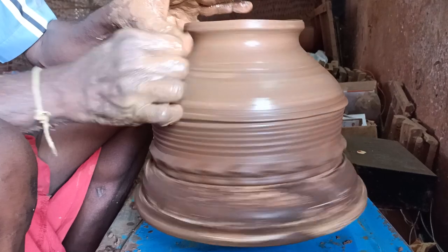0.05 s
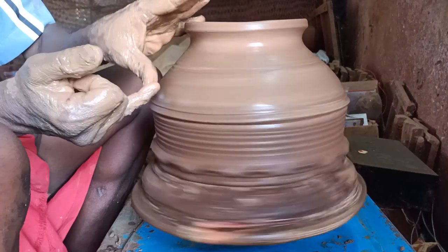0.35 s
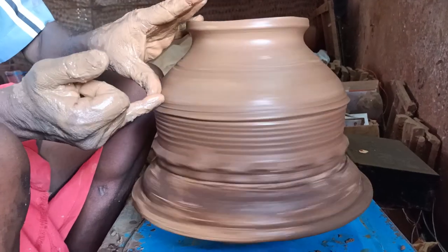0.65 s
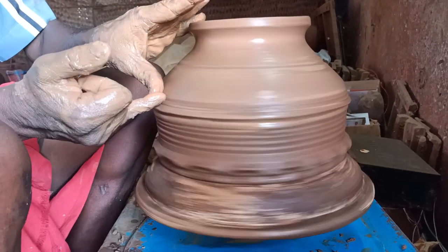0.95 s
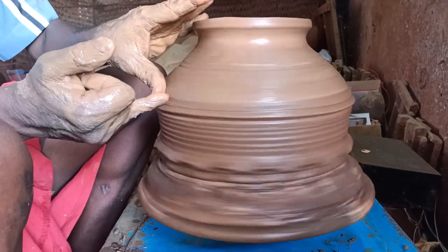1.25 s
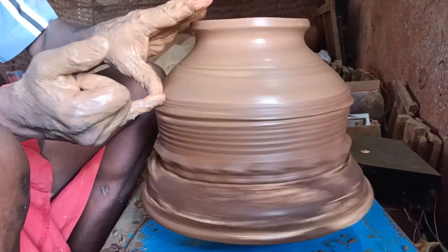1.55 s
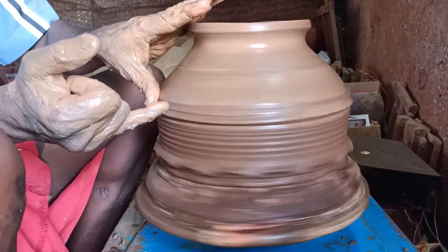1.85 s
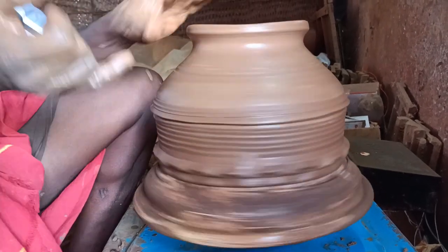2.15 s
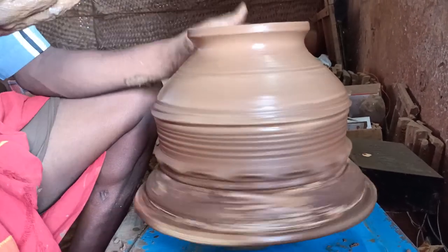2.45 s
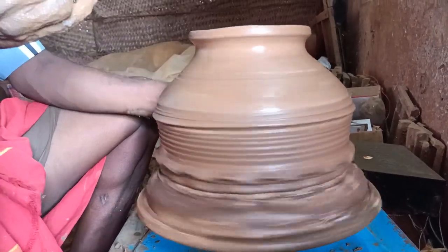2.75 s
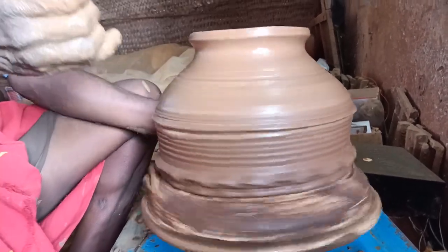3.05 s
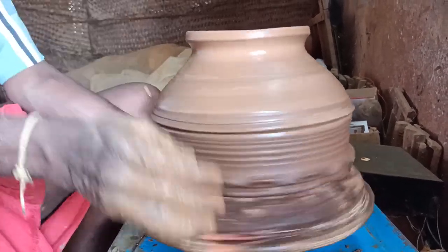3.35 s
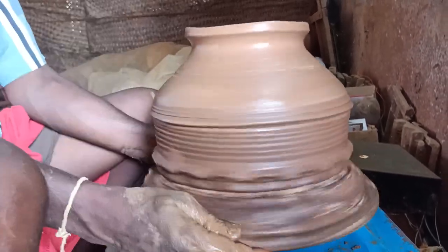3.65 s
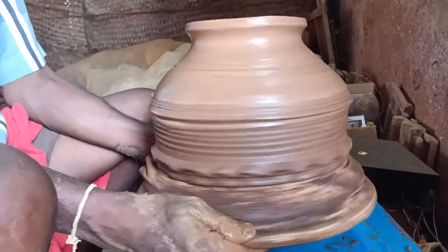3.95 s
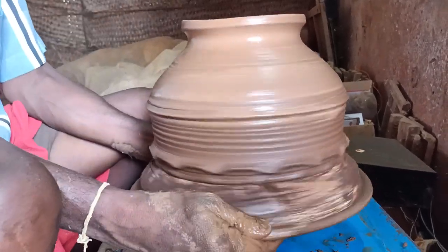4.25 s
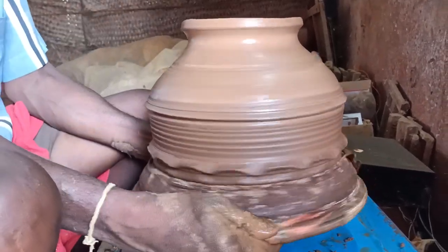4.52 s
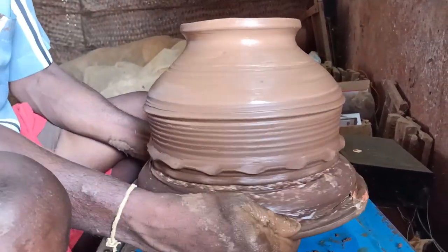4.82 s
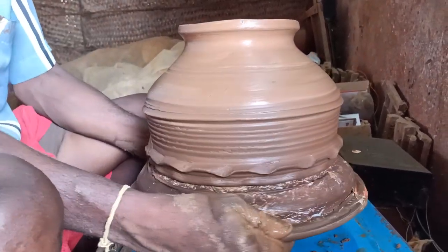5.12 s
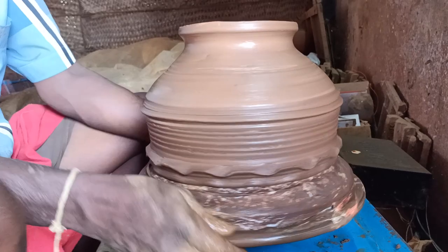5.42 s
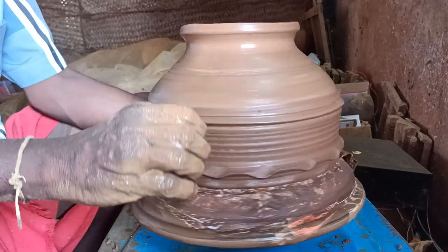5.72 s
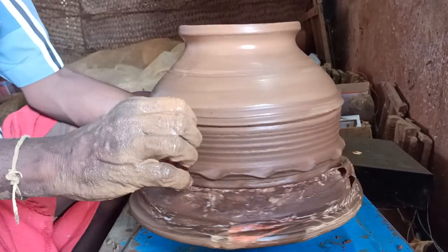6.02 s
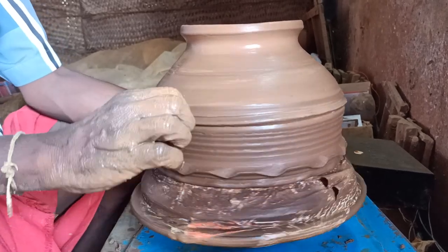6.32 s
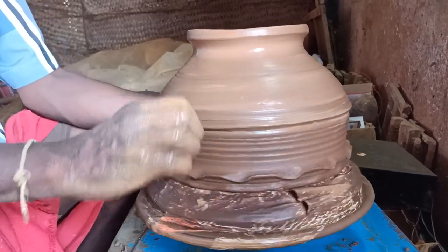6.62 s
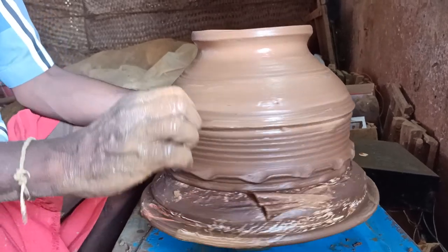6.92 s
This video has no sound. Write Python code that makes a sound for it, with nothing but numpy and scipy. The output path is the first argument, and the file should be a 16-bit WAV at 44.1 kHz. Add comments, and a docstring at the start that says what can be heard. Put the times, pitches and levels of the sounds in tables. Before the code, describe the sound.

Gritty rumble of a spinning pottery wheel; a small tool snaps down, wet clay squeaks under a hand, and the wheel slows, groaning softly.

```python
"""A small workshop: a motor-driven potter's wheel carries a heavy wet pot, and its gritty bearing sets the
steel stand rumbling and rattling. The motor's hum is switched off and a small hard tool skitters down
with a snap. A palm drags on the wet clay, squeaking as it sticks and slips, and brakes the wheel almost
to rest. Nudged on, the wheel rolls slowly with a low groan and faint knocks."""
import sys
import numpy as np
from scipy import signal
from scipy.fft import rfft, irfft, next_fast_len
from scipy.io import wavfile
from scipy.ndimage import uniform_filter1d

SR = 44100
rng = np.random.default_rng(int(sys.argv[2]) if len(sys.argv) > 2 else 0)


def unload_wav(signal):
    """Save mono or channel-first audio to the path in sys.argv[1] as 16-bit WAV at rate SR, clipped to [-1, 1]."""
    wavfile.write(
        sys.argv[1],
        SR,
        np.round(np.clip(np.atleast_2d(signal).T, -1, 1) * 32767).astype(np.int16),
    )


N = 312228
TIME = np.arange(N) / SR

# Levels in the tables are relative: each layer sets its own trim in the mix.
# Tone colours. Each row: frequency in Hz, level in dB.
AIR_SPECTRUM = [(15, -38), (25, -19), (42, -1.5), (55, 2), (76, 0.5), (200, -15), (270, -42), (416, -10),
                (840, -25.5), (5140, -36.5), (6210, -57.5), (9840, -38.5), (14400, -41), (16000, -55.5)]
TOOL_SPECTRUM = [(40, -23), (300, -14), (2000, -19.5), (2700, -5.5), (4500, -16), (7300, -26.5),
                 (8300, -10.5), (9100, 3.5), (10000, -4.5), (12000, -10.5), (15500, -33.5)]
POP_SPECTRUM = [(500, -31), (2500, -39), (4500, -10), (7000, -8), (9500, 11), (12500, -1), (15500, -28)]
CLAY_SPECTRUM = [(20, -12), (45, -7), (70, -3), (310, 5.5), (660, -7), (850, -6), (1350, 1), (1550, 1),
                 (1950, 4.5), (2300, -6), (3000, 5), (4000, -10), (4700, -11), (5700, -6.5), (6200, -41),
                 (16000, -35)]
SIZZLE_SPECTRUM = [(3820, -43), (6500, -18), (6830, -22), (7330, -19.5), (7760, -17.5), (8210, -7),
                   (9330, 0.5), (10500, -1), (13100, -13), (16000, -55)]

# How each part rings. Each row: frequency in Hz, bandwidth in Hz, level in dB.
MOTOR_SHELL_MODES = [(420.8, 7, -5.5), (497, 8.4, -7.5), (569, 9, 5.5), (675, 4, -4.5), (865, 7.2, 5),
                     (955, 25, -8.5), (2636, 13, -9), (3200, 12, -6.5)]
HOLLOW_MODES = [(439, 35, -1), (484, 35, 1.5), (550, 30, 0.38)]  # where the tool lands
DRAG_MODES = [(408, 14, 1), (628, 55, -1), (704, 91, -5), (1112, 34, -8.5), (1353, 33, -6)]  # the palm's groan
JUDDER_MODES = [(78, 35, 0)]  # the palm's low shudder
CREEP_MODES = [(414, 17, 2), (453, 34, -8)]  # the bearing at a crawl
HOUSING_MODES = [(1870, 240, -16), (2405, 120, 4), (2720, 330, 2.5), (2940, 130, -1), (3433, 220, -6.5),
                 (4530, 130, -5.5), (5600, 300, -18)]
SHAFT_MODES = [(119.6, 12, -3.5), (148.2, 8.3, 13), (433, 12, -25)]
STAND_MODES = [(200.6, 17, 7.5), (210.5, 48, -3), (233, 46, -38)]
PLATE_MODES = [(399, 64, -3), (417.6, 22.2, 4), (455.4, 33.3, -2.5), (504.7, 11.7, -0.5), (564.5, 20, -1),
               (644, 30, -6.5), (674, 78, -9), (843.3, 32, -4), (893, 19, -5.5), (956, 38, -4),
               (1039, 14.2, 1.5), (1101, 26, 0.5), (1138, 45, -1.5), (1322, 48, -6), (1450, 120, -12)]
FITTING_MODES = [(1670, 400, -9), (2356, 88, 3), (2677, 125, 2.5), (2978, 130, -2.5), (3172, 35.5, -0.5),
                 (3493, 250, -5.5), (4330, 410, -7), (4580, 124, -4.5), (4792, 56, -6.5), (5750, 400, -13)]

# Motor hum and whine. Each row: multiple of HUM_HZ, level in dB.
HUM_PARTIALS = [(1, 3.5), (2, 3), (3, -6.5), (10.48, -1)]
# One-shots. Each row: start in seconds, level in dB.
TOOL_BUMPS = [(2.945, -30), (2.99, -24), (3.02, -27.5)]
TOOL_TAPS = [(2.9974, -15.5), (3.032, -17), (3.048, -2.5), (3.0518, -10.5), (3.088, -15)]
CLAY_POPS = [(4.61, -27.5), (5.021, -40.5), (5.065, -46.5), (5.421, -54), (5.5323, -51), (5.561, -49),
             (5.68, -44), (5.848, -47), (6.244, -54)]
# Chirps from the clay. Each row: centre in seconds, length in seconds, pitch in Hz, level in dB.
CLAY_FIZZES = [(6.405, .03, 9980, -62), (6.48, .13, 10450, -68)]
PALM_SQUEAKS = [(3.99, .09, 1350, -41), (4.16, 0.071, 1410, -40), (4.222, 0.031, 1135, -31),
                (4.385, .04, 2030, -39.5), (4.41, 0.065, 1112, -33.5)]
# Fader rides for the pressing palm and the creeping bearing. Each row: time in seconds, level in dB.
PALM_RIDE = [(3.45, -52.5), (3.85, -43.5), (4.3, -49.5), (4.45, -52.5), (4.7, -54), (4.95, -80),
             (5.15, -99)]
CREEP_RIDE = [(5.5, -70), (5.63, -49), (5.95, -48.5), (6.1, -49.5), (6.25, -52), (6.68, -71), (6.95, -46),
              (7.08, -51.5)]

# The wheel's pace. Each row: time in seconds, share of full speed.
WHEEL_SPEED = [(2.7, 0.75), (3.6, 1), (4.6, 0.67), (5.1, 0.029), (5.45, .02), (5.7, 0.17), (7.08, 0.081)]
# The off-centre pot, the ball cage and the passing balls press in cycles.
# Each row: cycles per turn, first peak in turns, then relative swings of thrum, rumble and grit in dB.
WOBBLE_CYCLES = [(.5, .16, .8, .9, 1.1), (1, .27, .1, 1.3, 1.9), (2, .27, 1.7, .6, .5),
                 (3.73, .05, 1.8, .3, .3)]
# Load on the bearing. Each row: time in seconds, then shaft rocking, stand thrum and plate rumble in dB.
LOAD_RIDE = [(0, -34, -25.5, -24.5), (.3, -34, -33.5, -29.5), (2.55, -35.5, -31, -29),
             (2.75, -29, -30, -27), (3.45, -42, -31, -30), (3.72, -33.5, -30.5, -26),
             (4.2, -41.5, -33.5, -30.5), (4.42, -37.5, -32, -31.5), (4.92, -46, -40.5, -49.5),
             (5.1, -57.5, -65.5, -76), (5.42, -59, -48.5, -59), (5.49, -60, -57, -60),
             (5.54, -45, -48, -51), (5.62, -42.5, -33.5, -40.5), (5.73, -43, -34.5, -40.5),
             (5.86, -50, -37.5, -44), (5.94, -47, -37, -37.5), (6.05, -42.5, -44, -48.5),
             (6.35, -52.5, -42, -55), (6.8, -50.5, -52, -62.5), (6.88, -63, -42, -52),
             (7.08, -43, -67, -65)]
# Grit in the race. Each row: time in seconds, rattle in dB, sizzle in dB.
GRIT_RIDE = [(0, -29, -43), (.35, -32.5, -44), (2.8, -32.5, -44), (3.12, -28.5, -46.5), (3.4, -36, -47.5),
             (3.67, -29, -44.5), (4.1, -45, -47), (4.59, -49, -48), (4.91, -66.5, -61.5),
             (5.13, -78.5, -71), (5.46, -72.5, -72.5), (5.62, -55, -65.5), (5.76, -57, -72),
             (5.86, -57, -70), (5.95, -62, -72), (6.04, -71, -72), (7.08, -83, -76.5)]
# The race runs clear for a moment. Each row: centre in seconds, length in seconds, dip in dB.
GRIT_LULLS = [(0.32, .06, -3.5), (0.403, .06, -0.5), (1.234, 0.093, -4.5), (1.556, 0.051, -3),
              (1.66, 0.073, -3.5), (1.95, 0.057, -6.5), (2.074, 0.13, -4), (2.79, 0.071, -4.5)]
# The stand booms and the heavy load lurches. Each row: centre in seconds, length in seconds, level in dB.
STAND_BOOMS = [(.05, 0.1, -46), (.59, 0.048, -24), (.7, 0.046, -25.5), (1.01, 0.14, -24.5),
               (1.35, 0.14, -27), (1.69, 0.26, -29), (1.84, 0.057, -25), (2.03, 0.093, -22),
               (2.5, 0.062, -26.5), (3.69, 0.079, -26.5), (4.4, 0.3, -25.5), (4.64, 0.064, -26),
               (5.945, 0.1, -31.5), (6.875, 0.085, -38)]
LOAD_LURCHES = [(.84, 0.063, -31), (2.52, 0.14, -32.5), (2.8, 0.064, -31), (3.14, 0.038, -26.5),
                (3.99, 0.14, -31), (4.42, 0.083, -34), (5.41, 0.12, -44), (5.55, 0.11, -39),
                (5.84, 0.12, -38.5), (5.99, 0.081, -35.5), (6.33, 0.094, -43), (6.59, 0.25, -41),
                (6.97, 0.15, -39.5)]
# The shaft grinds on its housing.
# Each row: centre in seconds, length in seconds, then low plates, upper plates and rattle in dB.
SHAFT_RUBS = [(0.067, 0.031, -32, -23.5, -25), (0.993, 0.095, -47, -24, -25), (1.343, 0.1, -32, -34, -30.5),
              (1.636, 0.048, -21, -26.5, -29), (1.736, 0.047, -22.5, -26.5, -31),
              (1.812, 0.075, -32, -35, -25.5), (2.028, 0.065, -43, -21.5, -32.5),
              (2.561, 0.071, -37, -36, -24.5), (2.663, 0.1, -27.5, -25, -46), (2.75, 0.12, -30, -27, -44),
              (3.104, 0.21, -56, -43, -33), (3.542, 0.071, -24, -33, -28), (3.694, 0.051, -23, -23, -40),
              (3.815, 0.07, -23.5, -25.5, -46), (4.656, 0.12, -32.5, -34, -61), (4.842, 0.1, -42, -46, -65),
              (5.592, 0.1, -49, -43, -55), (5.775, 0.069, -59, -41, -46), (5.945, 0.06, -50, -48, -51),
              (6.185, 0.04, -45, -53, -64), (6.538, 0.031, -57, -53.5, -59), (6.572, 0.059, -66, -52, -66),
              (6.783, 0.027, -62.5, -64, -61), (6.827, 0.023, -61, -59, -47),
              (6.864, 0.096, -52.5, -42, -61), (6.976, 0.043, -50, -56, -70)]
# Play in the bearing knocks.
# Each row: start in seconds, level in dB, then offsets from it for plate weight and grit sizzle in dB.
BEARING_KNOCKS = [(0.014, -22, -7, 2), (0.055, -25, 10, 4), (0.126, -23, -1, 1.5), (0.185, -24, -1.5, 5.5),
                  (0.216, -24, -3, 4.5), (0.335, -22.5, 6, 3), (0.4504, -17, 0, -4), (0.494, -23, 9, 1),
                  (0.535, -31, 12, 3.5), (0.572, -23, -1.5, -1), (0.645, -27.5, 0, 2),
                  (0.771, -29.5, 3, 0.5), (0.817, -25, 10, 1), (0.887, -20, -3, -8.5),
                  (0.929, -20.5, -9, 1), (0.977, -18, 5.5, -1.5), (1.1287, -22.5, -5, -4.5),
                  (1.165, -31.5, -8, -5), (1.2954, -23, -2, -7.5), (1.3723, -19, 3.5, -2.5),
                  (1.415, -25.5, 12, 5.5), (1.445, -23.5, 6, -5), (1.612, -19.5, 6.5, -1.5),
                  (1.695, -18, 2, 2.5), (1.821, -27, 8, 6.5), (1.849, -21, 6, -1.5), (1.98, -25, 0, -3),
                  (2.133, -22.5, 2.5, -7), (2.176, -25.5, 4.5, -1.5), (2.2075, -23, 4.5, 5.5),
                  (2.327, -29, -3.5, 8.5), (2.371, -24.5, 3, 2.5), (2.458, -27.5, -3, 5),
                  (2.531, -21.5, 0, -1), (2.616, -21.5, -0.5, 1), (2.6468, -19, 4, 1), (2.7006, -19, 4, -2),
                  (2.85, -21.5, 5.5, -2.5), (2.9918, -18, 2, 4), (3.195, -32.5, 18, 4), (3.48, -27, 3, 6.5),
                  (3.523, -21, 5.5, 0.5), (5.5822, -46, 14, -3), (5.642, -36.5, 2, -7.5),
                  (5.705, -42, -2, -6), (5.7952, -33, 7, -4), (5.8778, -31.5, 7.5, -8.5),
                  (5.9177, -35.5, 5, 8.5), (6.085, -48, 8, -6), (6.2023, -48, 4, -1),
                  (6.2555, -40, 1, -5.5), (6.304, -41.5, 8.5, -4), (6.3768, -43, 5.5, -1.5),
                  (6.7175, -54, 8, 0), (6.833, -36.5, 3, -4), (7.058, -50.5, 7, -4)]
# Crossovers between the sizzle's bands. Each entry: frequency in Hz.
SPURT_EDGES_HZ = [9000, 9800, 10700, 11700, 12800]

ROOM_DULL_T60_S, ROOM_BRIGHT_T60_S = 0.5, 0.63
HUM_HZ, MOTOR_OFF_S = 100, 2.83  # the hum sits at twice the mains frequency
SKITTER_FROM_S, SKITTER_GAP_S, SKITTER_DB, SKITTER_RISE_DB = 2.848, 0.014, -28, 0.4
SCRAPE_S, SCRAPE_LENGTH_S, SCRAPE_DB = 4.39, 0.048, -46.5  # the palm catches once
GROAN_DB, GROAN_RISE_DB, GROAN_MAX_DB = -6.5, 34, 16.5  # against the rub: full speed, rise to rest, cap
TURNS_PER_S = 2.36  # at full speed
THRUM_WOBBLE, RUMBLE_WOBBLE, GRIT_WOBBLE = 0.54, 0.91, 0.16  # share of its swing that each part takes
SPURT_DB, SPURTS_PER_S = 2.2, 30
CLIP_CEILING, CUTOFF_HZ = 0.55, 15500


def from_db(db):
    """Decibels to gain."""
    return np.exp(np.asarray(db) * (np.log(10) / 20))


def unit_rms(x):
    """Scale to an rms of 1."""
    return x / np.sqrt(np.mean(x ** 2) + 1e-20)


def faders(ride):
    """Each dB column of a ride as a gain per sample."""
    times, *columns = np.transpose(ride)
    return [from_db(np.interp(TIME, times, db)) for db in columns]


def gate(start_s, end_s, fade_s):
    """A gate that fades in after its start and out before its end."""
    return np.clip((TIME - start_s) / fade_s, 0, 1) * np.clip((end_s - TIME) / fade_s, 0, 1)


def hump(centre_s, length_s):
    """One rounded rise and fall of height 1."""
    out = np.zeros(N)
    inside = np.abs(TIME - centre_s) < length_s / 2
    out[inside] = np.cos(np.pi * (TIME[inside] - centre_s) / length_s)
    return out


def swells(rows):
    """Humps, each with its own centre, length and level."""
    return sum(from_db(db) * hump(centre_s, length_s) for centre_s, length_s, db in rows)


def bursts(times, levels_db, rise_s, fall_s):
    """A percussive envelope triggered at each time."""
    triggers = np.zeros(N)
    np.add.at(triggers, np.clip(np.round(times * SR).astype(int), 0, N - 1), from_db(levels_db))
    t = TIME[:SR // 4]
    shape = (1 - np.exp(-t / rise_s)) * np.exp(-t / fall_s)
    return signal.oaconvolve(triggers, shape / shape.max())[:N]


def drift(rate_hz):
    """A smooth random modulator with an rms of 1."""
    step = 32
    size = next_fast_len(N // step + 2)
    hz = np.fft.rfftfreq(size, step / SR)
    slow = irfft(rfft(rng.standard_normal(size)) / (1 + (hz / rate_hz) ** 2), size)
    return np.interp(np.arange(N) / step, np.arange(size), unit_rms(slow))


def grains(per_s, spread_db):
    """A spray of tiny random impacts whose sizes scatter by spread_db; rms 1."""
    hits = np.flatnonzero(rng.random(N) < per_s / SR)
    chance = rng.uniform(-1, 1, N)[hits]
    size = np.minimum(-np.log(np.abs(chance) + 1e-12), 4)
    out = np.zeros(N)
    out[hits] = np.sign(chance) * from_db(spread_db * size)
    return unit_rms(out)


def colour(x, spectrum):
    """A minimum-phase EQ of unit energy that follows a spectrum."""
    size = 8192
    hz, db = np.transpose(spectrum)
    log_hz = np.log(np.fft.rfftfreq(size, 1 / SR) + 1)
    log_gain = np.log(from_db(np.interp(log_hz, np.log(hz), db)))
    cepstrum = irfft(log_gain)[:size // 2]
    cepstrum[1:] *= 2
    response = irfft(np.exp(rfft(cepstrum, size)))[:size // 2]
    return signal.oaconvolve(x, response / np.linalg.norm(response))[:N]


def resonate(force, modes, band_hz, shift_db=0):
    """Ring band-limited, damped modes; shift_db lets each one's level wander as the contact moves."""
    t = TIME[:SR // 3]
    rings = [(-1) ** k * from_db(db) * width * np.exp(-np.pi * width * t) * np.cos(2 * np.pi * hz * t)
             for k, (hz, width, db) in enumerate(modes)]
    rings = signal.sosfilt(signal.butter(5, band_hz, btype="band", fs=SR, output="sos"), rings)
    rings = rings / np.linalg.norm(rings.sum(axis=0))
    if not shift_db:
        return signal.oaconvolve(force, rings.sum(axis=0))[:N]
    return sum(signal.oaconvolve(force * from_db(shift_db * drift(22)), ring)[:N] for ring in rings)


def levelled(x, window_s):
    """Hold the level at 1 over a sliding window; faster beating stays."""
    mean_square = uniform_filter1d(x * x, max(int(window_s * SR), 2))
    return x / np.sqrt(np.abs(mean_square) + 1e-12)


def lowpass(x, order, corner_hz):
    """Roll off the highs."""
    return signal.sosfilt(signal.butter(order, corner_hz, fs=SR, output="sos"), x)


def room_tone():
    """The workshop's quiet air: a bed of bass-heavy noise."""
    return from_db(-61) * colour(rng.standard_normal(N), AIR_SPECTRUM)


def workshop_reverb(x):
    """Dense reflections off near walls: a dull tail and a slightly longer bright one."""
    t = TIME[:SR]
    echoes = rng.standard_normal(len(t)) * np.clip(t / 0.0074, 0, 1)
    dull = lowpass(echoes, order=2, corner_hz=4500) * from_db(-60 * t / ROOM_DULL_T60_S)
    tail = dull + echoes * from_db(-60 * t / ROOM_BRIGHT_T60_S)
    return signal.oaconvolve(x, tail / np.linalg.norm(tail))[:N]


def motor():
    """Mains hum, firm at the bottom and wavering above; the rotor sets the motor shell singing."""
    rotor = grains(per_s=4000, spread_db=5.0)
    out = from_db(4.0) * resonate(rotor, MOTOR_SHELL_MODES, band_hz=(353, 3900))
    for multiple, db in HUM_PARTIALS:
        waver = min(multiple - 1, 1)
        phase = 2 * np.pi * (multiple * HUM_HZ * TIME + rng.random()) + 0.39 * waver * drift(2.1)
        out += np.sqrt(2) * np.sin(phase) * from_db(db - 1.5 + 4.9 * waver * drift(5.6))
    return from_db(-43.5) * out * gate(-1, MOTOR_OFF_S, fade_s=0.25)


def tool_bumps():
    """The tool's weight pushes softly on its hollow resting place."""
    hollow = resonate(rng.standard_normal(N), HOLLOW_MODES, band_hz=(150, 895))
    return levelled(hollow, window_s=0.013) * bursts(*np.transpose(TOOL_BUMPS), rise_s=0.005, fall_s=0.018)


def tool_snap():
    """The tool skitters in a growing run of hops, then snaps down; each hard contact chatters briefly."""
    hops = [(SKITTER_FROM_S + SKITTER_GAP_S * (k + rng.uniform(-.1, .1)),
             SKITTER_DB + SKITTER_RISE_DB * k + rng.normal(0, 1.5)) for k in range(8)]
    times, db = np.vstack([hops, TOOL_TAPS]).T
    chatter = grains(per_s=47000, spread_db=-1.5) * bursts(times, db, rise_s=0.0004, fall_s=0.0031)
    return from_db(-4.5) * colour(chatter, TOOL_SPECTRUM)


def chirps(rows, waver_hz, wavers_per_s):
    """Short tones of unsteady pitch."""
    waver = waver_hz * np.cumsum(drift(wavers_per_s)) / SR
    return sum(from_db(db) * hump(centre_s, length_s) * np.sqrt(2) * np.sin(2 * np.pi * (hz * TIME + waver))
               for centre_s, length_s, hz, db in rows)


def clay_fizz():
    """Air squeezes out of the wet clay in a faint, high fizz."""
    return chirps(CLAY_FIZZES, waver_hz=420, wavers_per_s=600)


def clay_pops():
    """Wet films burst in tiny pops as the clay lets go of the skin."""
    pops = rng.standard_normal(N) * bursts(*np.transpose(CLAY_POPS), rise_s=0.00022, fall_s=0.003)
    return from_db(-3.5) * colour(pops, POP_SPECTRUM)


def palm(speed):
    """Wet clay sticks and slips under the hand: a squeaky rub that groans and judders as the wheel slows."""
    pressure, = faders(PALM_RIDE)
    pressure = np.hypot(pressure, from_db(SCRAPE_DB) * hump(SCRAPE_S, SCRAPE_LENGTH_S))
    slips = grains(per_s=7400, spread_db=-0.5) * from_db(2.0 * drift(40))
    rub = colour(slips, CLAY_SPECTRUM)
    judder = from_db(-13.0) * resonate(slips, JUDDER_MODES, band_hz=(45, 124))
    groan_db = np.minimum(GROAN_DB + GROAN_RISE_DB * (1 - speed), GROAN_MAX_DB)
    groan = from_db(groan_db) * (resonate(slips, DRAG_MODES, band_hz=(390, 1560)) + judder)
    drag = from_db(6.5) * pressure * gate(3.43, 5.12, fade_s=0.061) * (rub + groan)
    return drag + chirps(PALM_SQUEAKS, waver_hz=14, wavers_per_s=70)


def bearing_creep():
    """At a crawl the dry bearing sticks and slips in a low groan."""
    level, = faders(CREEP_RIDE)
    groan = resonate(grains(per_s=900, spread_db=0.0), CREEP_MODES, band_hz=(345, 494))
    return from_db(-3.5) * level * gate(5.5, 8, fade_s=0.086) * groan


def shaft_rubs():
    """Dry grinding swells and fades; each rub shakes its own blend of plates and fittings."""
    centres, lengths, *levels_db = np.transpose(SHAFT_RUBS)
    friction = from_db(-7.0) * grains(per_s=3200, spread_db=3.0)
    low = resonate(friction, PLATE_MODES, band_hz=(366, 722))
    upper = resonate(friction, PLATE_MODES, band_hz=(765, 1583))
    rattle = resonate(friction, FITTING_MODES, band_hz=(1870, 5340), shift_db=2.0)
    return sum(swells(zip(centres, lengths, db)) * layer
               for db, layer in zip(levels_db, (low, upper, rattle)))


def crunch_share(speed):
    """Share of the contacts that run together into a crunch; it grows with speed."""
    return np.clip(0.28 + 0.79 * speed, 0, 1)


def spurting(sizzle):
    """Each band of a sizzle flares and fades on its own; the mean level stays."""
    spectrum = rfft(sizzle)
    band = np.searchsorted(SPURT_EDGES_HZ, np.fft.rfftfreq(N, 1 / SR))
    return sum(irfft(spectrum * (band == k), N) * unit_rms(from_db(SPURT_DB * drift(SPURTS_PER_S)))
               for k in range(len(SPURT_EDGES_HZ) + 1))


def bearing_knocks(speed):
    """The shaft shifts in its play: a drawn-out crunch at speed, a short scuff of the housing when slow."""
    times, db, weight_db, sizzle_db = np.transpose(BEARING_KNOCKS)
    share = crunch_share(speed)
    contacts = grains(per_s=3500, spread_db=1.0)
    fittings = resonate(contacts, FITTING_MODES, band_hz=(1480, 6460))
    housing = resonate(contacts, HOUSING_MODES, band_hz=(1826, 5600), shift_db=8.0)
    plates = resonate(contacts, PLATE_MODES, band_hz=(375, 1760))
    crunch = levelled(fittings, window_s=0.02) * bursts(times, db, rise_s=0.0024, fall_s=0.014)
    scuff = levelled(housing, window_s=0.0091) * bursts(times, db, rise_s=0.0009, fall_s=0.0074)
    weight = levelled(plates, window_s=0.016) * bursts(times, db + weight_db, rise_s=0.001, fall_s=0.021)
    crushed_grit = share * contacts * bursts(times, db + sizzle_db, rise_s=0.002, fall_s=0.012)
    sizzle = spurting(colour(crushed_grit, SIZZLE_SPECTRUM))
    return (from_db(-8.5) * share * crunch + from_db(-4.5) * (1 - share) * scuff
            + from_db(-15.0) * weight + from_db(-16.5) * sizzle)


def wobble(speed):
    """Tremolo on thrum, rumble and grit as the wheel goes round; slower and shallower at low speed."""
    turns = TURNS_PER_S * np.cumsum(speed) / SR
    return speed * sum(np.outer(swings_db, np.cos(2 * np.pi * per_turn * (turns - peak)))
                       for per_turn, peak, *swings_db in WOBBLE_CYCLES)


def bearing_roll(speed):
    """Balls crunch over grit in surges; the one force shakes shaft, stand, plates and fittings."""
    rocking, thrum, rumble = faders(LOAD_RIDE)
    rattle, sizzle = faders(GRIT_RIDE)
    thrum_db, rumble_db, grit_db = wobble(speed)
    rocking = np.hypot(from_db(-4.0) * rocking, from_db(-3.5) * swells(LOAD_LURCHES))
    thrum = np.hypot(thrum * from_db(-3.5 + THRUM_WOBBLE * thrum_db), from_db(-2.0) * swells(STAND_BOOMS))
    rumble = rumble * from_db(-4.0 + RUMBLE_WOBBLE * rumble_db)
    # The surges ease while the palm steadies the wheel.
    surge_db = drift(25) * np.interp(TIME, [3.6, 4.0, 5.3, 5.6], [1.0, 0.31, 0.35, 1.0])
    force = grains(per_s=7000, spread_db=2.5)
    surging = force * from_db(surge_db)

    shaft = rocking * levelled(resonate(force, SHAFT_MODES, band_hz=(115, 486)), window_s=0.083)
    stand = thrum * levelled(resonate(force, STAND_MODES, band_hz=(161, 280.7)), window_s=0.095)
    bright = resonate(surging, PLATE_MODES, band_hz=(316, 1540))
    dull = unit_rms(lowpass(bright, order=1, corner_hz=905))  # slow contacts last longer and lose highs
    share = crunch_share(speed)
    plates = rumble * (share * bright + (1 - share) * dull)

    fittings = resonate(surging, FITTING_MODES, band_hz=(1358, 5650), shift_db=2.5)
    fine_grit = colour(grains(per_s=18950, spread_db=2.5) * from_db(0.49 * surge_db), SIZZLE_SPECTRUM)
    grit = from_db(-4.0) * rattle * fittings + spurting(sizzle * fine_grit)
    lull_db = sum(dip_db * hump(centre_s, length_s) for centre_s, length_s, dip_db in GRIT_LULLS)
    return shaft + stand + plates + grit * from_db(GRIT_WOBBLE * grit_db + lull_db)


def scene():
    """Wheel, hand and tool over room tone, in mono; only the knocks and the snap feed the reverb."""
    speed = np.interp(TIME, *np.transpose(WHEEL_SPEED))
    knocks, snap = bearing_knocks(speed), tool_snap()
    clay = palm(speed) + clay_pops() + clay_fizz()
    room = room_tone() + workshop_reverb(from_db(-7.0) * knocks + from_db(-4.5) * snap)
    wheel = bearing_roll(speed) + bearing_creep() + motor() + knocks
    tool = tool_bumps() + snap
    return (room + tool + clay + wheel + shaft_rubs())[None]


def record(dry):
    """Soft-clip the loudest peaks and cut the top steeply."""
    rounded = CLIP_CEILING * np.tanh(dry / CLIP_CEILING)
    return signal.sosfilt(signal.ellip(10, .1, 90, CUTOFF_HZ, fs=SR, output="sos"), rounded)


dry = scene()
out = record(dry)
unload_wav(out)
```